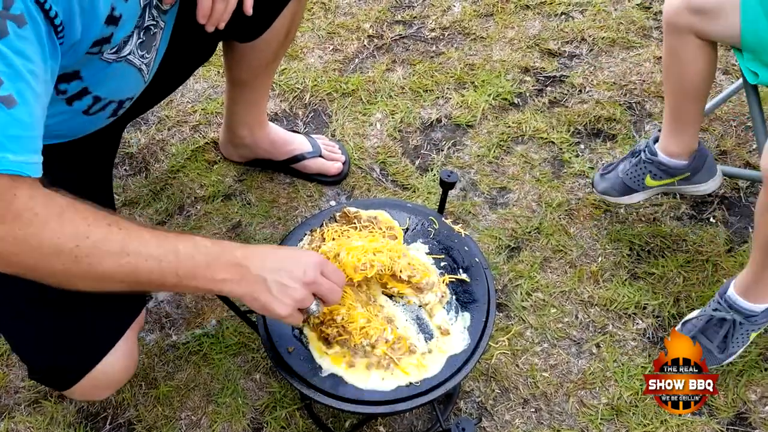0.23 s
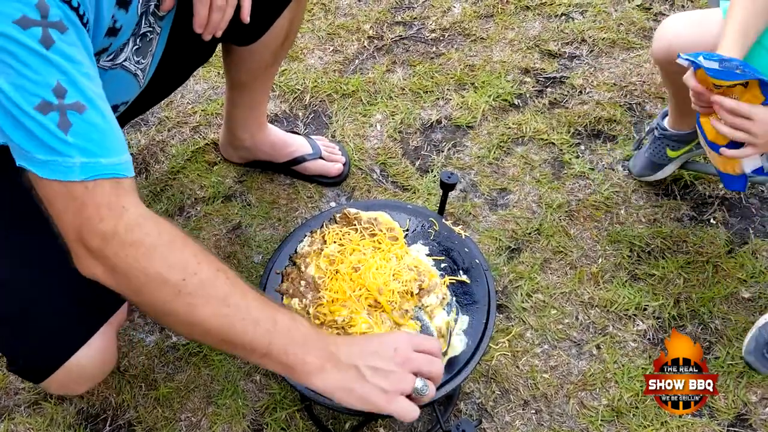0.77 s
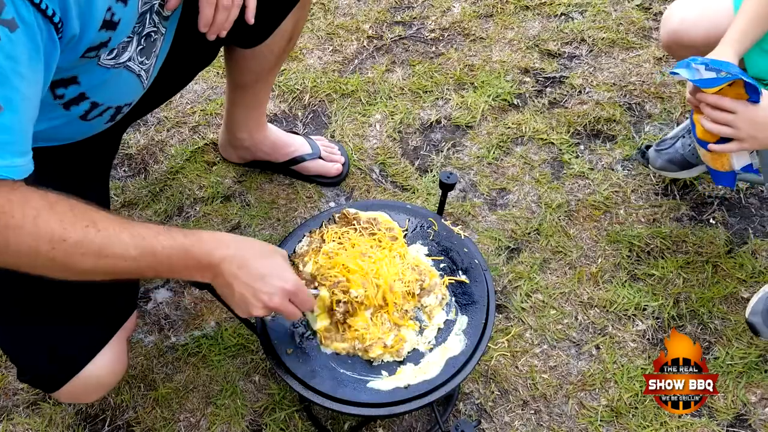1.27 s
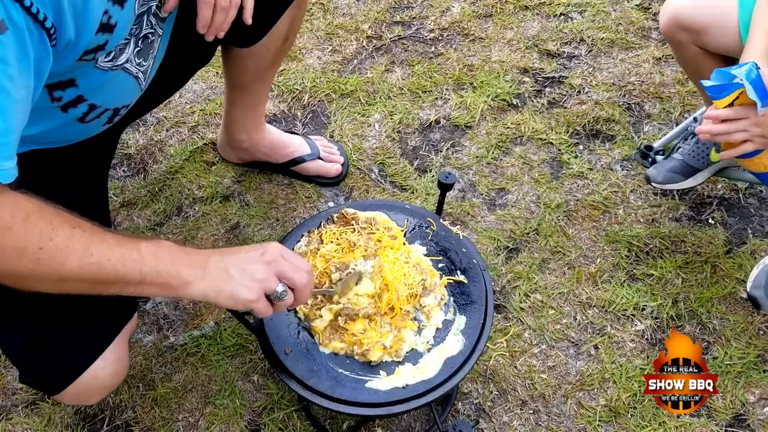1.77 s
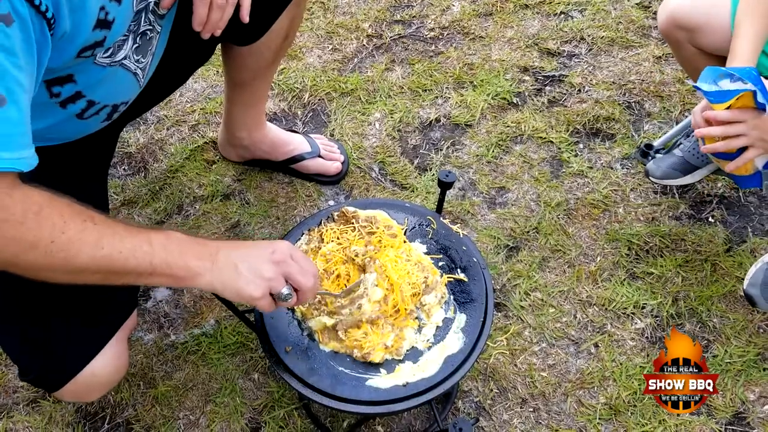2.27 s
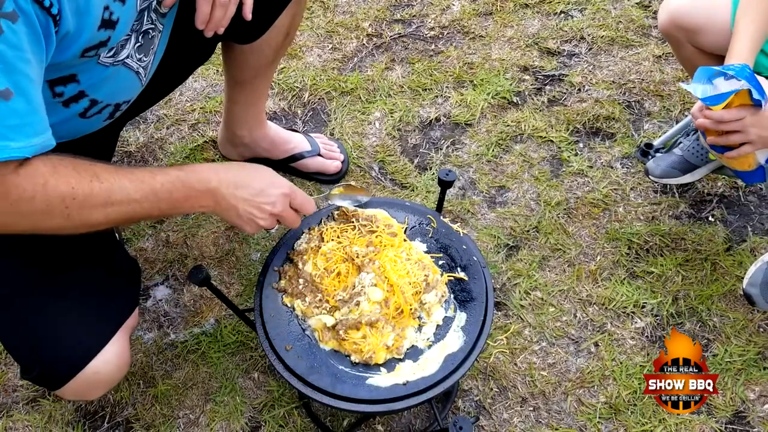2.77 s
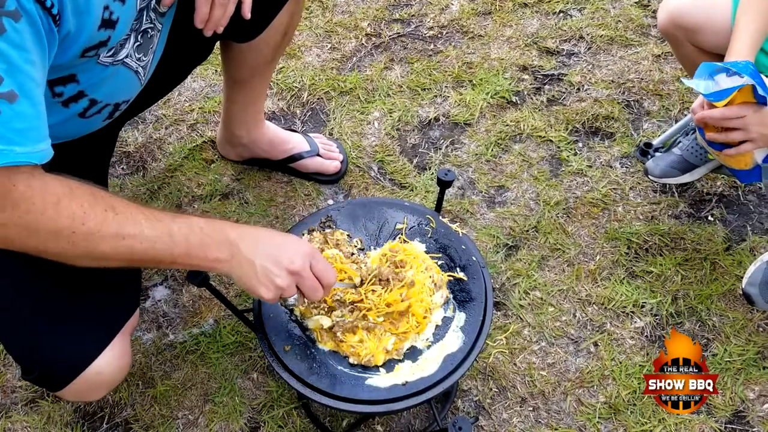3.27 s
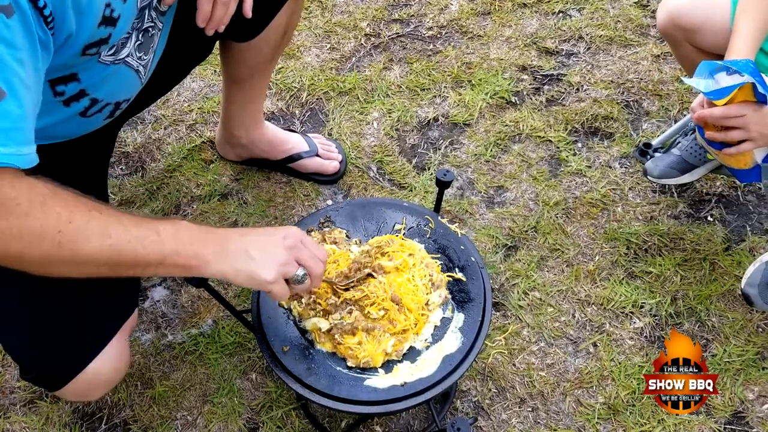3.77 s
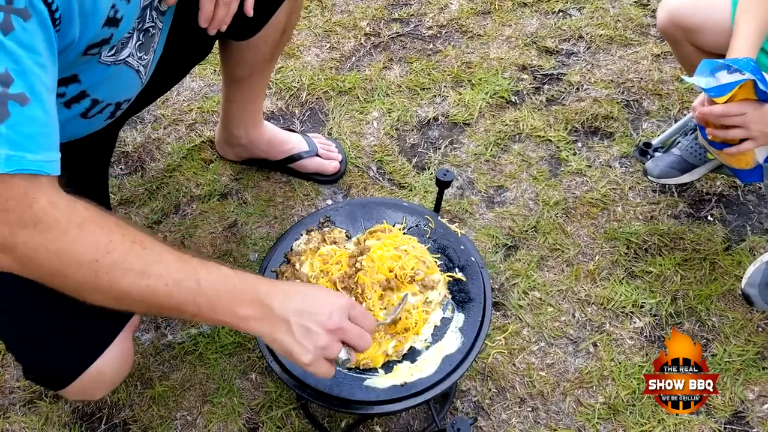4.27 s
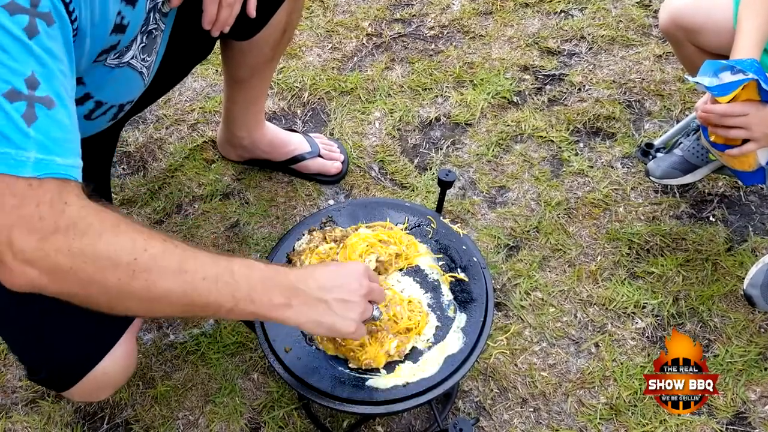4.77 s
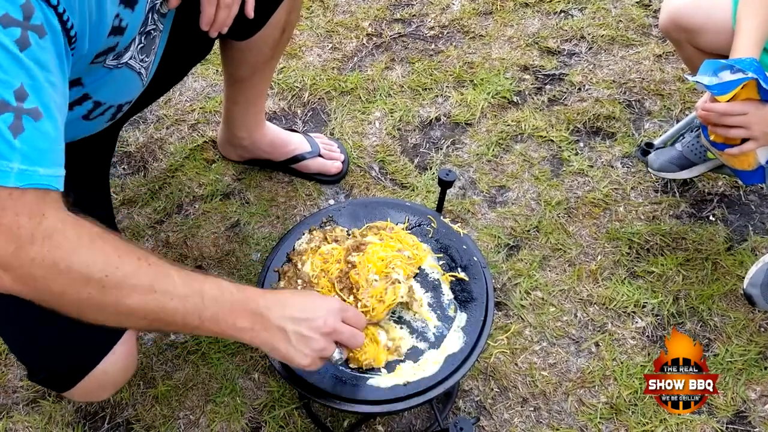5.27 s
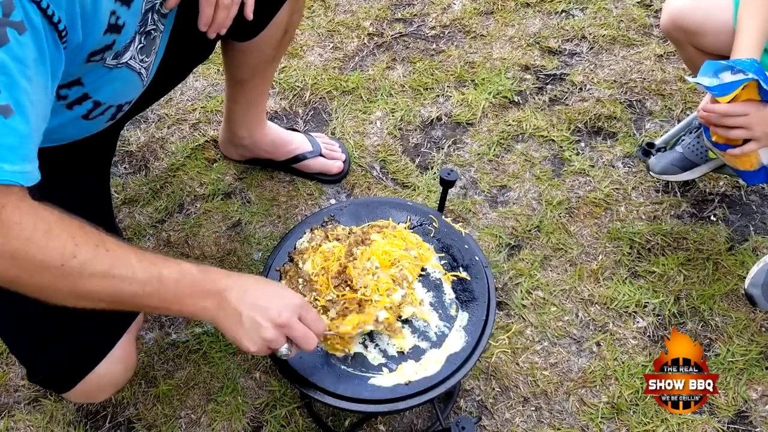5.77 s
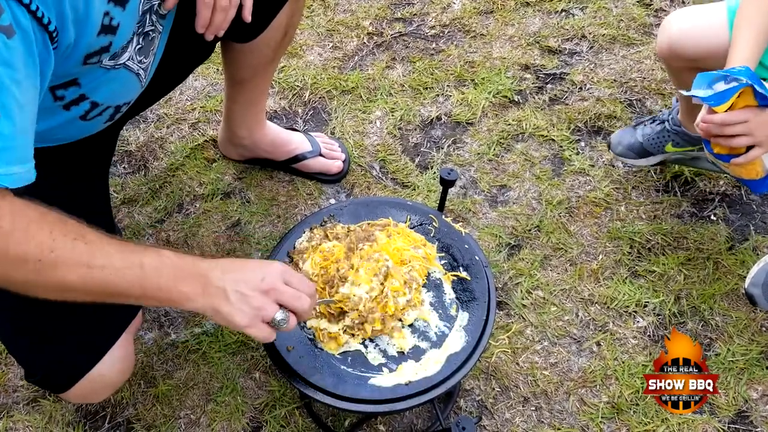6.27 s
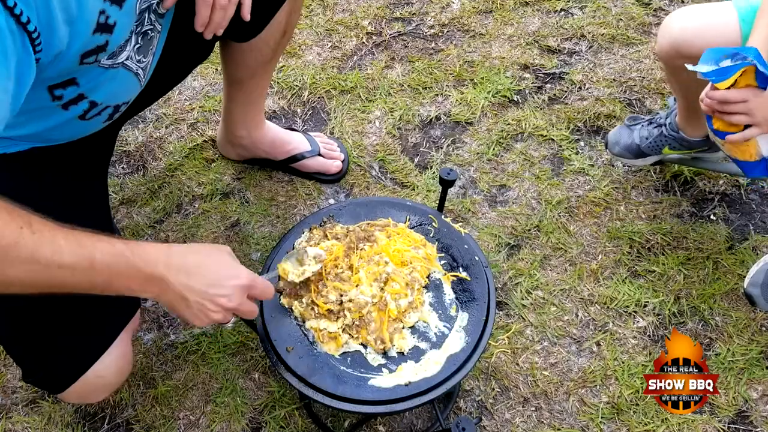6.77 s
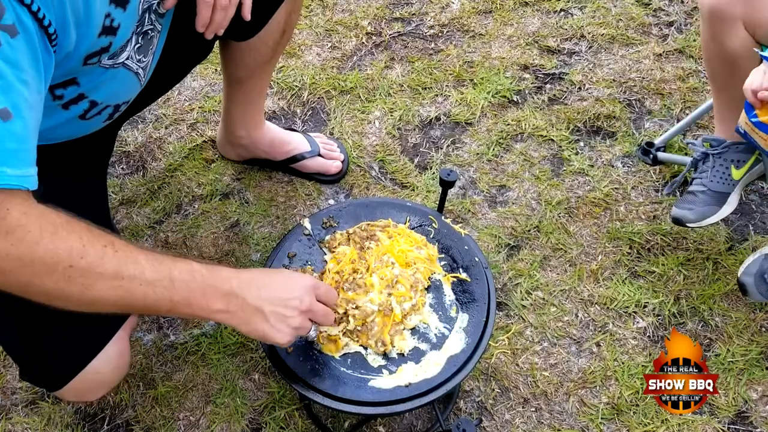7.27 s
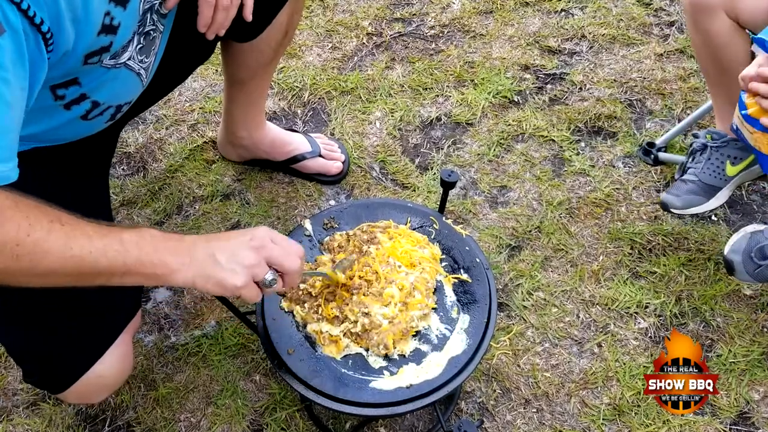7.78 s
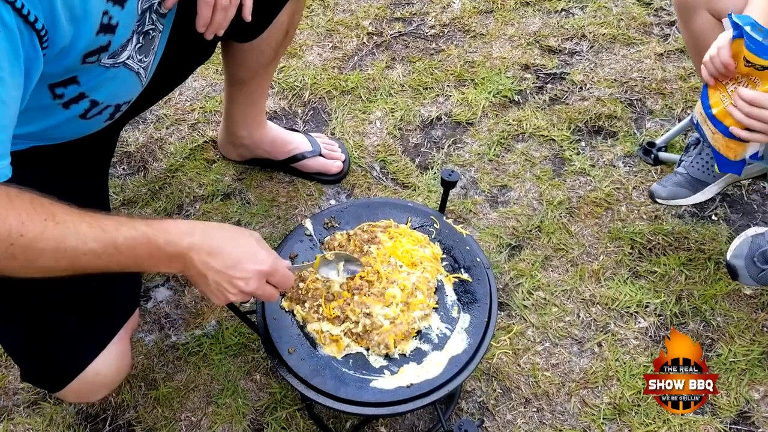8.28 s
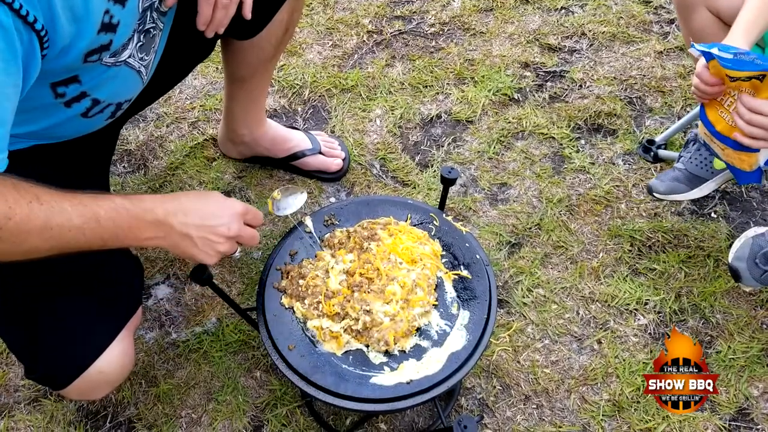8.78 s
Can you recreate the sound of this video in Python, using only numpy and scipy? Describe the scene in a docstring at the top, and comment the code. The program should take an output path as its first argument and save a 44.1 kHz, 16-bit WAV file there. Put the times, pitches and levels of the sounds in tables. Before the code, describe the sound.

Outdoors and close up, sporadic gritty spoon scrapes ring on iron, with faint sizzling, tiny clicks, distant birdsong, and a late gust of wind.

```python
"""On a lawn, a metal spoon scrapes and knocks on a cast-iron griddle, turning wet food.
Scrapes are stick-slip noise driving modes of spoon and iron; knocks are impacts on the same modes.
The food pops and sizzles in random clicks, small metal pieces tinkle as beating sines, and a bird
repeats a whistled phrase of gliding tones. Filtered noise makes the air and the wind;
near the end a gust rumbles on the microphone."""
import sys
import numpy as np
from scipy import signal
from scipy.io import wavfile
from scipy.ndimage import uniform_filter1d

SR = 44100
rng = np.random.default_rng(int(sys.argv[2]) if len(sys.argv) > 2 else 0)


def dump(signal):
    """Clip the signal to [-1, 1] and save it as 16-bit WAV at the path in sys.argv[1]."""
    limited = np.clip(np.atleast_2d(signal).T, -1, 1)
    pcm = np.round(limited * 32767).astype(np.int16)
    wavfile.write(sys.argv[1], SR, pcm)


N = 397782
TIME = np.arange(N) / SR

# All levels in the tables are relative; sounds are pairs of channels.

# Strokes of the spoon: start_s, full_pressure_after_s, length_s, level_db, swell_db, edge_brightness_db,
# dulling_db (as it digs in), plate_weight_db, wet_fizz_db, crunch_db
SPOON_STROKES = [(0.0, 0.023, 0.039, -36, -19, 9, 7.5, -35, -13, -19),
                 (0.048, 0.072, 0.081, -59.5, -4, 5, 5, 2, 4, -16),
                 (0.664, 0.31, 0.4, -27.5, 12.5, -8, -1.5, -14.5, -18.5, -12),
                 (0.799, 0.049, 0.06, -39, -1, -1.5, 6, -16, -9, -27),
                 (1.07, 0.016, 0.12, -55, -7, 3, -3, -8, -8, 0),
                 (2.799, 0.17, 0.16, -34, 10, 1.5, 11, -5, -8, -3.5),
                 (4.367, 0.21, .29, -27.5, 21.5, 5.5, 20, -14, -2, -2),
                 (5.074, 0.1, 0.094, -29.5, 4.5, -1, 2.5, -19, -13.5, -8.5),
                 (5.599, 0.084, .18, -28, -1, -9.5, -3, -13, -21.5, -16)]
BITE_S, SAG_DB_PER_S, LIFT_DB_PER_S = 0.046, 39, 628  # the edge bites, the hand eases, the spoon lifts
PLATE_RISE_DB, GRIT_DB = 14, 3  # growth of the low modes over a stroke; spread of slip sizes
DIG_S, DIG_LEAD_S = 0.023, 0.022  # the edge digs in over this time, just before full pressure


def scrapes():
    """Stick-slip friction: grainy slips drive the modes, louder and duller as the edge digs in."""
    slips = clicks(N, per_s=2400, spread_db=GRIT_DB)
    slips /= np.sqrt(abs(uniform_filter1d(slips[0] ** 2, size=900)) + 1e-9)
    grain = slips + gain_of(-7) * rng.standard_normal((2, N))
    drive = grain * gain_of(2 * drift(N, rate=110))
    spoon = spoon_modes(colour(drive, lambda hz: read(SLIP_CLICK, hz)))
    iron = colour(drive, lambda hz: iron_db(hz, ring_db=3))
    rasp = sliding(spread(iron + gain_of(2) * spoon, GRIDDLE_WIDTH))
    # Filtering forwards and backwards keeps the phase, so differences of low-passes give bands.
    below = [band(band(rasp, hz, "low")[:, ::-1], hz, "low")[:, ::-1] for hz in (900, 3300, 8600)]
    bands = np.diff([0 * rasp, *below, rasp], axis=0)
    plate, body, edge, fizz = (part / part.mean(0).std() for part in bands)

    out = np.zeros((2, N))
    for start, push, length, db, swell, bright, dulling, weight, wet, crunch_db in SPOON_STROKES:
        on = (TIME >= start) & (TIME < start + length + .1)
        t = TIME[on] - start
        dig = .5 + .5 * np.tanh((t - push + DIG_LEAD_S) / (2 * DIG_S))
        pressure_db = db - swell * np.maximum(1 - t / push, 0)
        pressure_db -= SAG_DB_PER_S * np.maximum(t - push, 0)
        pressure_db -= LIFT_DB_PER_S * np.maximum(t - length, 0)
        treble = gain_of(bright - dulling * dig) * edge[:, on]
        treble += gain_of(wet - dulling * dig) * fizz[:, on]
        bass = gain_of(weight - 1 - PLATE_RISE_DB * (1 - dig)) * plate[:, on]
        stroke = bass + body[:, on] + treble + gain_of(crunch_db) * crunch(t - push, dig)
        out[:, on] += np.minimum(t / BITE_S, 1) * gain_of(pressure_db) * stroke
    return gain_of(-2.0) * out


def spoon_modes(x, low_hz=3700, high_hz=8200, width_hz=35, count=24):
    """Modal excitation: as the contact travels along the edge, each mode swells and fades on its own."""
    out = np.zeros_like(x)
    for hz in np.geomspace(low_hz, high_hz, count) * rng.uniform(.985, 1.015, count):
        feed = np.exp(.8 * np.clip(drift(N, rate=22), -2, 1.5))
        mode = band(x * feed, [hz - width_hz / 2, hz + width_hz / 2], "bandpass", order=2)
        out += mode * rng.choice([-1, 1])
    return out * x.std() / out.std()


def sliding(x, delay_s=0.00092, travel=0.21, share=0.41):
    """Comb interference: a wave returns along a path that changes as the contact slides."""
    at = (TIME - delay_s * (1 + travel * drift(N, rate=9))) * SR
    return x + share * x[:, np.clip(np.round(at).astype(int), 0, N - 1)]


CRUNCH_S, CRUNCH_WIDTH_HZ = 0.039, 1040
CRUNCH_FROM_HZ, CRUNCH_TO_HZ = 3400, 700


def crunch(t, dig):
    """Swept resonance: coarse slips around t = 0 ring a broad mode that falls as the edge digs in."""
    hz = CRUNCH_FROM_HZ * (CRUNCH_TO_HZ / CRUNCH_FROM_HZ) ** dig
    turn = np.exp(2j * np.pi * np.cumsum(hz) / SR)
    r = np.exp(-np.pi * CRUNCH_WIDTH_HZ / SR)
    slips = clicks(len(t), per_s=1500, spread_db=3.5)
    # A one-pole filter in the rotating frame is a resonator of moving pitch.
    ring = (turn * signal.lfilter([1 - r], [1, -r], slips / turn)).real
    ring = band(ring, [520, 4200], "bandpass", order=3)
    return evened(spread(ring, GRIDDLE_WIDTH)) * np.exp(-(t / CRUNCH_S) ** 2)


# Ringing modes of griddle and spoon: pitch_hz, width_hz, level_db
IRON_MODES = [(675, 30, -10), (850, 110, -10), (1175, 22, 5), (1215, 32, 2), (1320, 57, -7), (1420, 60, -7),
              (1497, 21, 5.5), (1545, 45, -4), (1670, 100, -9), (1890, 55, -4), (2035, 40, -2),
              (2180, 50, -2), (2260, 50, .5), (2330, 40, -3), (2410, 34, 1), (2810, 14, -4), (3135, 36, -2),
              (3330, 40, -8), (3520, 30, -9), (3775, 18, -5), (3835, 20, -3), (3970, 20, -6),
              (4078, 20, -3), (4145, 38, -1), (4366, 18, 0), (4600, 80, -7), (4720, 60, -8), (4900, 30, -7),
              (5150, 90, -7), (5380, 30, -10), (6270, 230, -12), (7330, 120, -16)]
# Spectrum of the bare click of one slip: frequency_hz, level_db
SLIP_CLICK = [(150, -59), (400, -27), (620, -7.5), (1000, -25), (2400, -17.5), (3500, -14.5), (5000, -18),
              (7000, -22), (9500, -32), (12000, -31), (15500, -30)]


def iron_db(hz, ring_db=0):
    """Modal superposition: the powers of the bare click and of the resonance curves add up."""
    ring = sum(gain_of(db + ring_db) ** 2 / (1 + (2 * (hz - f) / width) ** 2)
               for f, width, db in IRON_MODES)
    return 10 * np.log10(gain_of(read(SLIP_CLICK, hz)) ** 2 + ring)


# Runs of catching and juddering: start_s, length_s, peak_db, crack_centre_hz
EDGE_CATCHES = [(0.0975, .002, -21, 2000), (0.0205, .004, -21, 2800), (0.9387, .012, -21, 2200),
                (0.9937, .008, -20, 2200), (2.9675, .004, -23, 1400), (4.5241, .019, -16, 4500),
                (4.556, .022, -15, 3200), (4.5868, .006, -13, 2000), (4.6017, .01, -17, 2000),
                (4.623, .014, -15, 1800), (4.6415, .014, -19, 1700), (5.1447, .012, -18, 2500),
                (5.6579, .009, -18, 1900), (5.7014, .008, -17.5, 2100), (5.763, .002, -21, 3000)]
JUDDER_HZ = 233.2  # slips per second, about, while the edge catches


def catches(jitter=.2, uneven_db=2, sharpness=1.2, ring_db=-11):
    """Relaxation oscillation: the edge catches and lets go in a quick run of dry, sharp slips."""
    out, n = np.zeros((2, N)), SR // 8
    for s, length, db, centre_hz in EDGE_CATCHES:
        gaps, sizes, sides = rng.standard_normal((3, 12))
        at = np.append(0, np.cumsum(np.exp(jitter * gaps[1:]))) / JUDDER_HZ
        size = gain_of(uneven_db * sizes) * (at <= length)
        slips = np.zeros((2, n))
        slips[:, np.minimum(at * SR, n - 1).astype(int)] = size, size * np.sign(sides)

        def crack_db(hz):
            """Resonance around the crack's centre, cut below 600 Hz, with some iron ringing."""
            detuning = (hz + 1) / centre_hz - centre_hz / (hz + 1)
            crack = 1 / (1 + (sharpness * detuning) ** 2) / (1 + (600 / (hz + 1)) ** 8)
            return 10 * np.log10(crack + gain_of(ring_db + iron_db(hz)) ** 2)

        sound = spread(colour(slips, crack_db), GRIDDLE_WIDTH)
        add(out, s, gain_of(db) * sound / abs(sound.mean(0)).max())
    return out


# The sliding spoon sings or hisses in one resonance: middle_s, length_s, pitch_hz, width_hz, level_db
SPOON_SQUEALS = [(0.664, 0.026, 4630, 100, -34), (.73, .16, 3140, 44, -42), (.75, 0.2, 5700, 60, -49),
                 (.79, 0.12, 4600, 65, -46), (.8, .2, 2320, 170, -37), (.93, 0.12, 4150, 60, -40),
                 (1.03, 0.11, 4380, 260, -37), (1.09, .22, 3832, 19, -46), (4.44, .16, 2390, 150, -38),
                 (4.475, .12, 3140, 60, -41), (4.479, 0.11, 6350, 520, -35), (4.548, 0.1, 4400, 1000, -33),
                 (5.738, 0.09, 2812, 30, -31), (5.737, 0.089, 3910, 68, -39), (5.805, 0.11, 3832, 11, -47),
                 (5.747, 0.14, 5200, 120, -43)]


def squeals():
    """Friction-fed resonance: narrow-band noise at one mode of the spoon swells and fades."""
    out = np.zeros((2, N))
    for s, length, hz, width, db in SPOON_SQUEALS:
        n = round(length * SR)
        noise = rng.standard_normal((2, SR))
        # Only the end is kept, once the filter has settled.
        tone = band(noise, [hz - width / 2, hz + width / 2], "bandpass", order=2)[:, -n:]
        add(out, s - length / 2, gain_of(db) * evened(tone) * signal.windows.hann(n))
    return spread(out, GRIDDLE_WIDTH)


# The spoon lands on the iron: start_s, level_db, brightness_db, chatter_s
SPOON_KNOCKS = [(0.651, -23, 11, 0.016), (3.676, -29.5, -2, 0.0093), (4.37, -28, 19, 0.01),
                (5.036, -34.5, 0, 0.012), (5.202, -30, 3, 0.0056), (5.582, -21, -3.5, 0.007),
                (7.206, -28.5, -20, 0.0066)]


def knocks(chatter_db=-9, ring_db=1, tilt=0.3, neutral_db=-3):
    """Impact excitation: the spoon lands, chatters for some milliseconds, and the iron rings."""
    out, t = np.zeros((2, N)), np.arange(SR // 5) / SR
    for s, db, bright_db, chatter in SPOON_KNOCKS:
        blow = gain_of(chatter_db) * rng.standard_normal((2, len(t))) * np.exp(-t / chatter)
        blow[:, 0] += 1
        slope_db = tilt * (bright_db - neutral_db)  # per octave, for two octaves above 1200 Hz

        def blow_db(hz):
            """The iron's response with the treble tilted."""
            return iron_db(hz, ring_db) + slope_db * np.clip(np.log2((hz + 1) / 1200), 0, 2)

        ring = spread(colour(blow, blow_db), GRIDDLE_WIDTH)
        add(out, s, gain_of(db) * ring / ring[:, :SR // 200].std())
    return gain_of(-7.5) * out


# The spoon squeaks on the greasy plate: start_s, length_s, from_hz, to_hz, level_db, bend (no unit)
SPOON_SQUEAKS = [(1.08, 0.053, 1147, 1605, -52, 0.025), (1.13, 0.059, 1504, 2120, -53, 0.057),
                 (5.998, .08, 2460, 5120, -53, 0.54)]


def squeaks(mode_hz=4920, width_hz=350, boost_db=16):
    """Locked stick-slip: slips in step rise in pitch and flare on crossing a resonance of the spoon."""
    out = np.zeros((2, N))
    for s, *squeak in SPOON_SQUEAKS:
        tone = whistle(*squeak, crest=0.83, fade_db=13, waver=.02, overtone_db=-8, count=3)
        add(out, s, tone)

    def flare_db(hz):
        """A flat-topped boost around the mode."""
        return 10 * np.log10(1 + gain_of(boost_db) ** 2 / (1 + (2 * (hz - mode_hz) / width_hz) ** 4))

    return colour(out, flare_db, size=1024)


# Small metal pieces touch: start_s, level_db
METAL_TOUCHES = [(0.153, -49), (0.198, -34), (0.468, -32.5), (0.971, -34.5), (1.195, -47.5), (1.611, -49.5),
                 (2.03, -50.5), (2.355, -43), (2.791, -51), (2.968, -53), (7.217, -57), (8.246, -51),
                 (8.985, -56.5)]
# Their close modes: pitch_hz, level_db, t60_s
METAL_MODES = [(8699, -5, .33), (8753, -2, .34), (8792, -3, .34), (8834, -4, .3), (8857, -5, .3)]


def tinkles(uneven_db=-4.0):
    """Beating: nearly equal small metal pieces ring together as decaying sines of close pitch."""
    out, t = np.zeros((2, N)), np.arange(SR // 2) / SR
    for s, db in METAL_TOUCHES:
        ring = np.zeros((2, len(t)))
        for hz, level, t60 in METAL_MODES:
            decay = gain_of(level + uneven_db * rng.standard_normal() - 60 * t / t60)
            ring += decay * np.sin(2 * np.pi * (hz * t + rng.random((2, 1))))
        onset = 1 - np.exp(-t / 0.00044)
        add(out, s, gain_of(db) * ring / ring[:, :SR // 50].std() * onset)
    return gain_of(-6.5) * spread(out, GRIDDLE_WIDTH)


# Wet food parts and pops: start_s, level_db, pocket_hz, treble_snap_db, t60_s
FOOD_POPS = [(0.1214, -34.5, 2190, -58, 0.055), (0.284, -35.5, 4670, -48, 0.045),
             (0.2986, -32.5, 3240, -48, 0.042), (0.465, -38.5, 4530, -55, 0.045),
             (0.5, -34.5, 4670, -52, 0.039), (1.366, -36.5, 3850, -52, 0.065),
             (1.501, -34, 5800, -41.5, 0.045), (1.533, -36.5, 4280, -55, 0.066),
             (1.5466, -29.5, 4790, -43.5, 0.043), (1.6556, -38, 4370, -60, 0.045),
             (1.8032, -32.5, 6230, -49.5, 0.05), (2.0282, -35.5, 6200, -43, 0.056),
             (2.17, -47.5, 5880, -57, 0.04), (2.5681, -32, 5800, -52, 0.064),
             (6.552, -29.5, 4570, -44, 0.051), (6.8761, -32, 4550, -47, 0.037),
             (6.9153, -36.5, 4470, -43, 0.052), (7.009, -44.5, 4520, -57, 0.04),
             (7.0932, -36.5, 4500, -49, 0.042), (7.3357, -43.5, 4860, -56, 0.045),
             (7.438, -33, 4200, -66, 0.045), (7.842, -42, 5350, -62, 0.045),
             (7.955, -41.5, 5720, -63, 0.038), (7.9954, -40.5, 4270, -55, 0.068),
             (8.2132, -42, 4570, -66, 0.045), (8.2258, -37.5, 4580, -57, 0.036),
             (8.2407, -38, 3240, -51, 0.045), (8.269, -37, 4190, -54, 0.064),
             (8.4173, -35, 3440, -53, 0.058), (8.4452, -38.5, 4720, -65, 0.051),
             (8.4991, -43, 1870, -67, 0.052), (8.7475, -43, 4610, -70, 0.039),
             (8.9314, -38.5, 6130, -50.5, 0.042)]
# Spectrum of a pop: frequency_hz, level_db
POP_SPECTRUM = [(300, -3), (1200, 3), (2500, 4.5), (4800, 6.5), (7000, 7), (9000, -4), (15500, -4.5)]
# Fainter pops come by chance.
SMALL_POPS_PER_S, SMALL_POP_DB, SMALL_POP_TREBLE_DB, SMALL_POP_T60_S = 2.5, -45.5, -62, 0.036


def pops(after_db=-17, body_db=-11, cavity_db=11, cavity_width_hz=1000):
    """Cavity resonance: a wet film snaps, smaller clicks follow, and each pocket rings at its pitch."""
    out, t = np.zeros((2, N)), np.arange(SR // 8) / SR
    small = [(s, SMALL_POP_DB + 2 * rng.standard_normal(), rng.uniform(2600, 7000),
              SMALL_POP_TREBLE_DB, SMALL_POP_T60_S)
             for s in TIME[rng.random(N) < SMALL_POPS_PER_S / SR]]
    for s, db, cavity_hz, treble_db, t60 in [*FOOD_POPS, *small]:
        after = evened(clicks(len(t), per_s=3800, spread_db=2.5))
        burst = gain_of(after_db - 60 * t / t60) * after
        burst[:, 0] = 1, rng.choice([-1, 1])  # the snap itself

        def pocket_db(hz):
            """The pop's spectrum with the pocket's resonance."""
            return read(POP_SPECTRUM, hz) + cavity_db / (1 + (2 * (hz - cavity_hz) / cavity_width_hz) ** 2)

        body = colour(burst, pocket_db, size=1024)
        snap = band(burst, 10000, "high")
        for part, level in (body, db + body_db), (snap, treble_db):
            add(out, s, gain_of(level) * spread(part, GRIDDLE_WIDTH) / part[0, :SR // 200].std())
    return out


# Level of the faint frying: time_s, level_db
SIZZLE_LEVEL = [(0, -52), (0.55, -63), (1.5, -60), (2.2, -65.5), (4.1, -64.5), (4.3, -70.5), (4.95, -69.5),
                (5.3, -61), (6.7, -66), (7.25, -62.5), (7.7, -65), (9, -61.5)]
# Spectrum of the frying: frequency_hz, level_db
SIZZLE_SPECTRUM = [(500, -0.5), (1500, -0.5), (3300, 0.5), (4400, 0), (6500, -1.5), (9000, -8.5),
                   (14000, -5.5), (16000, 1)]


def sizzle(bubble_db=3.0):
    """Random superposition: tiny bubbles of different sizes burst under the food in uneven clumps."""
    octaves = [band(clicks(N, per_s=500, spread_db=bubble_db), [hz, 2 * hz], "bandpass", order=2)
               for hz in 1000 * 2 ** np.arange(4)]
    bubbles = evened(sum(octaves)) * gain_of(2.8 * drift(N, rate=25))
    hiss = bubbles + rng.standard_normal((2, N))
    hiss = colour(hiss, lambda hz: read(SIZZLE_SPECTRUM, hz), size=1024)
    level = gain_of(3 + np.interp(TIME, *np.transpose(SIZZLE_LEVEL)))
    return level * evened(spread(hiss, GRIDDLE_WIDTH))


STEAM_S, STEAM_LENGTH_S = 5.94, 0.9
STEAM_HZ, STEAM_WIDTH_HZ, STEAM_DB = 4440, 950, -65.5


def steam():
    """Band-limited noise: a soft, narrow hiss from the turned food swells and fades."""
    out, n = np.zeros((2, N)), round(STEAM_LENGTH_S * SR)
    edges = [STEAM_HZ - STEAM_WIDTH_HZ / 2, STEAM_HZ + STEAM_WIDTH_HZ / 2]
    hiss = band(rng.standard_normal((2, N)), edges, "bandpass", order=2)
    add(out, STEAM_S, gain_of(STEAM_DB) * evened(hiss)[:, :n] * signal.windows.hann(n))
    return spread(out, GRIDDLE_WIDTH)


# Slurs of the phrase, before stretching: offset_s, length_s, from_hz, to_hz, level_db,
# bend (no unit; below 0 the glide comes late)
SLURS = [(0, .065, 2620, 2770, -2, 0), (.04, .06, 2730, 3600, 5, -.4), (.142, .038, 4550, 3850, -2, 0),
         (.195, .055, 2520, 1900, -2.5, 0)]
# Each phrase: start_s, level_db, time_stretch (ratio)
BIRD_PHRASES = [(1.536, -53.5, 0.87), (1.87, -53, 0.93), (2.246, -51.5, 0.89), (2.61, -49.5, 0.93),
                (3.002, -50, 1), (3.391, -52, 0.98), (3.767, -53.5, 1.04)]
# Single notes: start_s, length_s, from_hz, to_hz, level_db, bend (no unit)
BIRD_NOTES = [(0.198, 0.047, 3330, 3300, -41, .5), (0.237, 0.046, 2610, 2160, -49, 0.42),
              (0.434, 0.04, 2445, 2130, -48.5, -0.44), (1.346, 0.08, 2750, 2020, -56, .2),
              (3.308, .052, 3110, 3550, -59, 0.33), (4.34, 0.077, 2720, 3460, -50, -0.025),
              (5.387, 0.077, 2790, 3200, -49.5, 0.94), (5.441, 0.051, 3240, 2570, -49, -0.16)]


def birds(direct_db=-7, near_db=-6, far_db=-11.5):
    """Multipath: slurred phrases and single notes arrive from some way off; echoes flutter the glides."""
    out = np.zeros((2, N))
    for start, db, stretch in BIRD_PHRASES:
        for s, length, from_hz, to_hz, level, bend in SLURS:
            sharp, push_db = 1 + .015 * rng.standard_normal(), 1.5 * rng.standard_normal()
            slur = whistle(stretch * length, sharp * from_hz, sharp * to_hz, db + level + push_db,
                           bend, crest=0.3, fade_db=10, waver=0.014)
            add(out, start + stretch * s, slur)
    for s, *note in BIRD_NOTES:
        add(out, s, whistle(*note, crest=0.42, fade_db=11, waver=0.0032))
    echoes = gain_of(near_db) * yard(out, t60=0.034) + gain_of(far_db) * yard(out, t60=0.86)
    return gain_of(direct_db) * out + echoes


# Spectrum of the outdoor murmur: frequency_hz, level_db
AIR_SPECTRUM = [(15, -39), (25, -22), (48, 6.5), (87, -2), (114, 3), (195, -7), (416, 5.5), (936, -8),
                (1190, -11), (2550, -21), (2840, -20), (3620, -27), (4140, -14), (6050, -20),
                (16000, -27.5)]
# Side against mid for the murmur: frequency_hz, level_db
AIR_STEREO = [(40, -28), (120, -49), (300, -10), (600, -4), (2000, 7.5), (12000, -4.5)]
AIR_DB, HUM_HZ, HUM_DB = -58.5, 118, -68.5


def air(treble_db=-6):
    """Diffuse field: shaped noise is the distant murmur; a frequency-modulated sine is the faint hum."""
    noise = colour(rng.standard_normal((2, N)),
                   lambda hz: read(AIR_SPECTRUM, hz) + treble_db * hz / (hz + 2000))
    murmur = evened(spread(noise, AIR_STEREO)) * gain_of(2.4 * drift(N, rate=8.9))
    turns = np.cumsum(HUM_HZ + 1.765 * drift(N, rate=6)) / SR
    hum = np.sin(2 * np.pi * (turns + np.array([[0], [.15]])))
    hum = evened(hum * gain_of(2 * drift(N, rate=3.0)))
    return gain_of(AIR_DB) * murmur + gain_of(HUM_DB) * hum


# Strength of the long gust: time_s, level_db
GUST_LEVEL = [(7.9, -69), (8.1, -54), (8.36, -50), (8.41, -56), (8.46, -42.5), (8.525, -38.5),
              (8.572, -26.5), (8.595, -35), (8.642, -32), (8.66, -37.5), (8.69, -32), (8.795, -33.5),
              (8.812, -53), (8.834, -38), (8.88, -41), (8.945, -33.5), (9.02, -53)]
# Spectrum of the wind: frequency_hz, level_db
WIND_SPECTRUM = [(20, -23), (48, -3), (80, 1), (125, 2), (220, -6.5), (320, -8.5), (500, -26), (700, -30),
                 (950, -40.5), (2500, -66)]
# Separate puffs on the microphone: crest_s, level_db, rise_s, fall_s
WIND_PUFFS = [(.17, -57, 0.35, 0.19), (1.82, -61.5, 0.18, 0.45), (2.35, -58, 0.38, 0.17),
              (5.89, -47, 0.2, 0.048)]
PUFF_DEPTH_DB, BREEZE_DB = 10.5, -81  # change over a rise or fall; the breeze before the gust


def wind(lump_db=5, left_db=-2.5, right_db=0.35, gust_db=0.25):
    """Turbulence: eddies buffet each microphone port on its own in a breeze, puffs and one long gust."""
    eddies = evened(colour(rng.standard_normal((2, N)), lambda hz: read(WIND_SPECTRUM, hz)))
    buffets = np.clip([drift(N, rate=34), drift(N, rate=37)], -1.5, 1.5)
    lumps = evened(gain_of(lump_db * buffets))
    puffs = [db - PUFF_DEPTH_DB * np.maximum((s - TIME) / rise, (TIME - s) / fall)
             for s, db, rise, fall in WIND_PUFFS]
    gust = gust_db + np.interp(TIME, *np.transpose(GUST_LEVEL), left=BREEZE_DB)
    strength = gain_of(np.max([gust, *puffs], axis=0) + 4.0)  # the strongest prevails
    return eddies * lumps * strength * gain_of([[left_db], [right_db]])


def yard(x, t60, size=20):
    """Sparse reflection: decaying random echoes come from the ground, fences and trees."""
    t = np.arange(SR // 2) / SR
    struck = (rng.random((2, len(t))) < 1 / size) * (t > .003)
    taps = rng.standard_normal((2, len(t))) * struck * gain_of(-60 * t / t60)
    taps /= np.linalg.norm(taps, axis=1, keepdims=True)
    return signal.oaconvolve(x, taps, axes=1)[:, :N]


def whistle(length, from_hz, to_hz, db, bend, crest, fade_db, waver, overtone_db=0, count=1, flutter_db=3):
    """Frequency modulation: an unsteady tone glides along a bow, swelling to its crest and fading."""
    u = np.arange(0, length, 1 / SR) / length  # share of the length; crest is one too
    hz = from_hz + (to_hz - from_hz) * (u + bend * u * (1 - u))
    turns = np.cumsum(hz * (1 + waver * drift(len(u), rate=480))) / SR
    tone = sum(gain_of(overtone_db * np.sqrt(k)) * np.sin(2 * np.pi * (k + 1) * turns)
               for k in range(count))
    tone = evened(tone * gain_of(flutter_db * drift(len(u), rate=76.0)))
    swell = gain_of(db - fade_db * np.interp(u, [0, crest, 1], [1, 0, 1]))
    return swell * tone * signal.windows.tukey(len(u), .1)


def clicks(n, per_s, spread_db):
    """Poisson-like process: random clicks of uneven size, as mid and side."""
    size = gain_of(spread_db * np.minimum(rng.exponential(1, n), 4)) * (rng.random(n) < per_s / SR)
    return size * rng.choice([-1., 1.], (2, n))


def drift(n, rate):
    """Random modulation: straight lines join normal random values, rate of them per second."""
    knots = np.arange(n) * rate / SR
    return np.interp(knots, np.arange(n), rng.standard_normal(n))


# Side against mid for sounds from the griddle: frequency_hz, level_db
GRIDDLE_WIDTH = [(300, -20), (1200, -13), (2400, -4.5), (4400, -3), (8000, -2), (14000, 2.5)]


def spread(pair, width):
    """Mid-side stereo: the second signal, coloured by the width, is added left and subtracted right."""
    side = colour(pair[1:], lambda hz: read(width, hz), size=1024)[0]
    return np.array([pair[0] + side, pair[0] - side])


def colour(x, db_at, size=8192):
    """Minimum-phase filtering: a causal filter whose gain in dB is a function of frequency."""
    log_gain = np.log(gain_of(np.maximum(db_at(abs(np.fft.fftfreq(size, 1 / SR))), -100)))
    taps = np.fft.ifft(np.exp(np.conj(signal.hilbert(log_gain)))).real[:size // 2]
    return signal.oaconvolve(x, taps[None], axes=1)[:, :x.shape[1]]


def band(x, hz, kind, order=4):
    """Butterworth filtering: a maximally flat passband."""
    return signal.sosfilt(signal.butter(order, hz, kind, fs=SR, output="sos"), x)


def read(points, hz):
    """Logarithmic frequency scale: a spectrum's value between its points."""
    f, value = np.transpose(points)
    return np.interp(np.log(hz + 1), np.log(f + 1), value)


def gain_of(db):
    """Level definition: decibels to amplitude."""
    return 10 ** (np.asarray(db) / 20)


def evened(x):
    """Power normalisation: scales to rms 1."""
    return x / np.sqrt(np.mean(x ** 2) + 1e-20)


def add(mix, s, sound):
    """Linear superposition: mixes a sound in at time s."""
    part = mix[..., max(round(s * SR), 0):][..., :sound.shape[-1]]
    part += sound[..., :part.shape[-1]]


def scene():
    """Superposition of sources: the griddle close by, with birds, air and wind around it."""
    metal = scrapes() + catches() + squeals() + knocks() + squeaks() + tinkles()
    food = sizzle() + steam() + pops()
    near = (metal + food) * gain_of([[-.5], [.5]])
    return near + gain_of(-19.5) * yard(near, t60=0.31) + birds() + air() + wind()


EDGE_HZ = 16300


def record(dry):
    """Band limitation: a linear-phase low-pass is the recorder's upper limit."""
    taps = signal.firwin(255, EDGE_HZ, window=("kaiser", 9), fs=SR)
    return signal.oaconvolve(dry, taps[None], "same")


dry = scene()
out = record(dry)
dump(out)
```